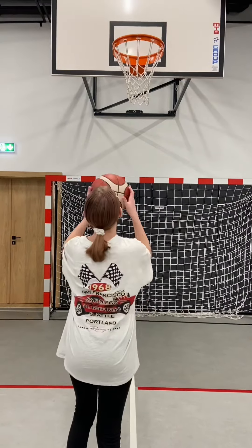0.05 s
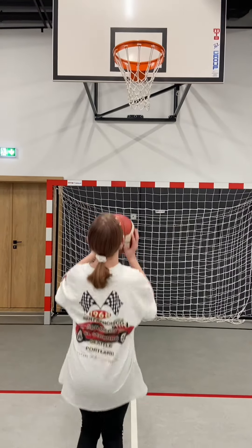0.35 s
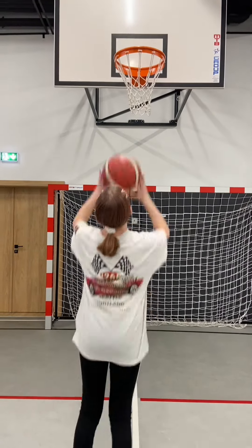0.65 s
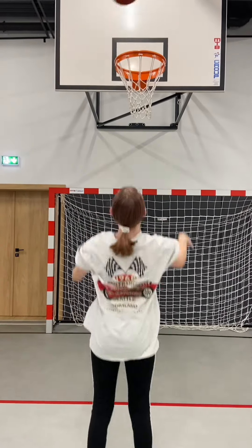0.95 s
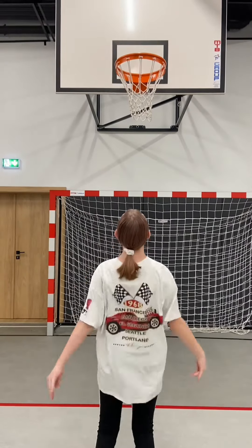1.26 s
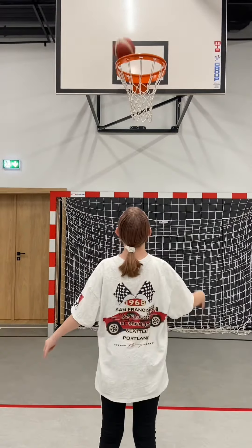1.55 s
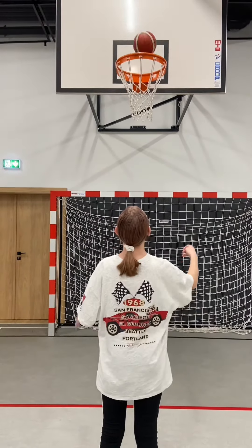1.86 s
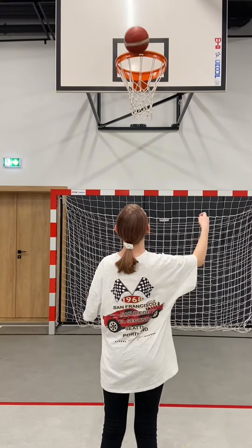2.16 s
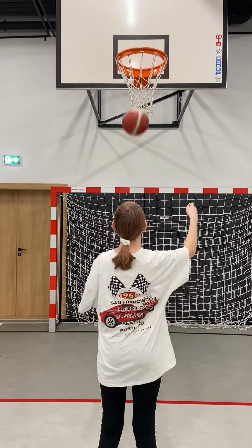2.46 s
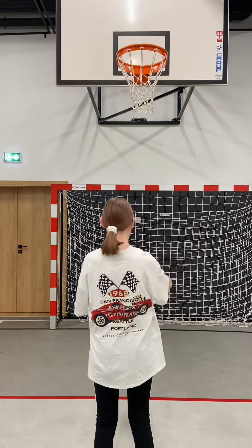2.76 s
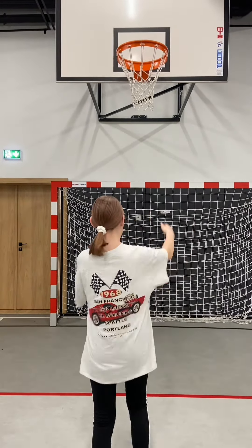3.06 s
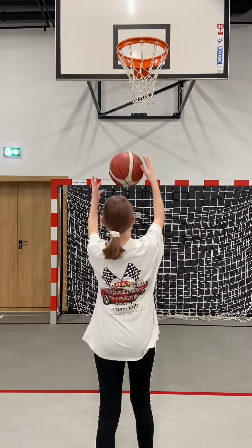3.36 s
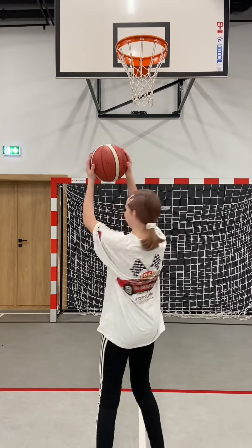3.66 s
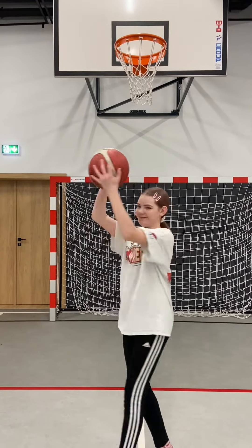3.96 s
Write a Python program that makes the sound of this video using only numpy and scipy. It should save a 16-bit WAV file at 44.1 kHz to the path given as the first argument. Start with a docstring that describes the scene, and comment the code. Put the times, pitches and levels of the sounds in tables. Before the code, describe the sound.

Basketball booming off the backboard and clattering on the rim, then one echoing floor bounce.

```python
"""A basketball slaps a backboard, whose frame booms and rattles, in a large, very live sports hall.
The ball knocks about on the steel rim, brushes the net, bounces once on the sprung floor and is caught.
Shoes thump and squeak over the hall's rumble. Impacts are impulses and bursts of small contacts that
drive filters, ringing modes and the hall's echo. A limiter holds the loud echoes down."""
import sys
import numpy as np
from scipy import signal
from scipy.fft import rfft, irfft, next_fast_len
from scipy.io import wavfile
from scipy.ndimage import uniform_filter1d, minimum_filter1d, map_coordinates

SR = 44100
rng = np.random.default_rng(int(sys.argv[2]) if len(sys.argv) > 2 else 0)


def wav_out(sig):
    """Save sig, one row per channel (or a flat mono array), as 16-bit PCM at SR to the path in sys.argv[1]."""
    wavfile.write(sys.argv[1], SR, np.round(np.clip(np.atleast_2d(sig).T, -1, 1) * 32767).astype(np.int16))


N = 176400

# Hall decay. Each row: frequency in Hz, T60 in seconds.
HALL_T60_S = [(60, 5.7), (150, 4), (400, 2.29), (1000, 7.5), (2500, 3.86), (5000, 1.85), (8000, 0.79),
              (11000, 0.65), (16000, .5)]
# First wall and floor echoes. Each row: delay in seconds, level in dB.
EARLY_ECHOES = [(.0172, 21), (0.0293, 28), (.037, 18.5), (0.0449, 16)]
# Diffuse field. Each row: frequency in Hz, left-right correlation (clipped to +-1 in use).
COHERENCE = [(100, 1), (280, 0.97), (500, 0.63), (900, -0.11), (1400, -0.12), (2500, 0.035), (5000, 0.81),
             (7300, -1.2), (9500, 0.46), (13000, 0.017)]
# Rumble envelope. Each row: time in seconds, level in dB.
RUMBLE_LEVEL_DB = [(0, -20), (.5, -19.5), (1.5, -21.5), (4, -19.5)]

# Source, echo and microphone spectra. Each row: frequency in Hz, gain in dB.
RUMBLE_EQ_DB = [(15, -50.5), (27, -17.5), (45, -7), (75, 0), (120, -3), (190, -0.5), (290, -5.5),
                (390, -15), (570, -13.5), (800, -17), (1200, -22), (2000, -27.5), (2900, -34),
                (3800, -43.5), (5200, -52.5), (7000, -65), (9800, -62), (13000, -69), (15500, -79.5)]
SWISH_EQ_DB = [(500, -27), (3000, 1.5), (5500, 15), (7300, -6), (10000, 5), (12000, 1.5), (16000, -18)]
PAT_EQ_DB = [(80, -33), (300, -7), (1000, -27.5), (2600, -16), (4200, -32), (5500, -27), (7300, -43.5),
             (10000, -38.5), (16000, -51.5)]
STEP_EQ_DB = [(25, -29), (70, 8), (120, 3), (200, -9.5), (400, -28), (2000, -52), (16000, -87)]
BOARD_EQ_DB = [(25, 17.5), (45, -5.5), (68, 21), (95, 8), (125, 19.5), (165, 19.5), (210, 5), (300, 7.5),
               (450, -5), (580, 0.5), (760, -7.5), (1150, -5.5), (2000, -6.5), (2900, -12), (4000, -18.5),
               (6000, -20.5), (9000, -31), (16000, -60.5)]
SOFT_BALL_EQ_DB = [(500, -2.5), (2000, -2), (4000, -9), (10000, -14)]
RATTLE_EQ_DB = [(100, -9.5), (400, 14), (1400, 9.5), (2800, 1.5), (4200, -20), (5800, -23), (7500, -61),
                (11000, -21), (16000, -44)]
KNOCK_EQ_DB = [(30, -20.5), (65, 18.5), (100, 2.5), (170, 1), (280, 0), (450, -14.5), (1200, -17),
               (2700, -22), (4000, -44), (16000, -61.5)]
JANGLE_EQ_DB = [(300, -50.5), (1500, -29), (2900, -20), (4000, -25), (5400, -22), (7300, -35.5),
                (9500, -28.5), (11500, -36), (13000, -48), (16000, -40)]
NET_EQ_DB = [(500, -11), (3000, 2), (5000, 13), (7300, -8.5), (9000, 7), (10500, -7.5), (16000, -20)]
BOUNCE_EQ_DB = [(25, -26), (45, 17), (62, 26.5), (85, 14), (115, 23.5), (170, 17), (220, 2), (270, 10),
                (340, 0.5), (455, 4), (560, -13), (780, -15), (1200, -27.5), (1800, -12), (2500, -7.5),
                (3100, -11.5), (3900, -22.5), (5200, -22), (7000, -31.5), (10000, -29), (13000, -35.5),
                (16000, -28)]
CRACK_EQ_DB = [(60, 10), (300, 26), (1000, 27.5), (1800, 21.5), (2600, 25), (3300, 13.5), (4300, 15),
               (5600, 1), (7000, -20), (16000, -45)]
SNAP_EQ_DB = [(500, 0), (4000, 9), (10000, -8), (13000, -5.5), (16000, -7)]
SKIN_EQ_DB = [(3000, -0.5), (9000, -9.5)]
WALL_EQ_DB = [(150, -8.5), (1200, -4.5), (5000, -4.5)]
MIC_EQ_DB = [(15, -14), (33, 0), (11800, 0), (13200, -4.5), (15700, -4.5)]
# Stereo balance. Each row: frequency in Hz, left minus right in dB.
PAN_DB = [(60, -1), (120, -1), (220, -2), (380, -5), (700, -2.5), (1250, 2), (2400, -0.3), (5000, 0)]

# Shoe squeaks. Each row: centre in seconds, half length in seconds, pitch in Hz, level in dB.
SOLE_SQUEAKS = [(.08, 0.1, 4540, -63), (1.16, 0.02, 4450, -55)]
# Cloth and soles brushing. Each row: centre in seconds, half length in seconds, level in dB.
BRUSHES = [(0.372, .14, -59), (0.704, 0.038, -55.5), (0.975, 0.018, -53.5), (2.902, 0.044, -49.5),
           (2.993, .015, -51), (3.543, 0.033, -58.5), (3.851, .22, -59)]
# Hand and sole taps. Each row: start in seconds, level in dB, T60 in seconds.
TAPS = [(0.667, -11, .012), (.948, -18.5, .03), (.971, -16, 0.022), (3.219, -12.5, .015),
        (3.233, -13.5, .015), (3.425, -14.5, .03), (3.511, -4.5, 0.044), (3.908, -2, 0.047),
        (3.931, -10.5, .04)]
# Feet landing. Each row: start in seconds, level in dB.
LANDINGS = [(.955, -7), (.988, 0), (1.108, -15)]
# Panel slamming in its brackets. Each row: start in seconds, level in dB.
PANEL_HITS = [(1.585, 2), (1.626, -3), (1.652, -3), (1.687, -8)]
# Ball on the rim. Each row: start in seconds, knock level in dB, jangle level in dB.
RIM_TOUCHES = [(1.712, 4, 3.5), (1.745, 4, -1), (1.776, -4.5, -6), (1.99, -8, -18), (2.025, -8.5, -13.5),
               (2.06, -1.5, -10.5), (2.209, -18.5, -19)]

# Board and frame modes. Each row: frequency in Hz, level in dB, T60 in seconds, rise in seconds.
BOOM_MODES = [(62.9, -10, 4.8, 0.71), (72.1, -14, 6.4, .25), (126.9, -17, 13, 0.21),
              (157.4, 7.5, 0.33, 0.0034), (180.6, -3.5, 0.47, 0.0024), (233, -2, .22, .002),
              (343, -1.5, 0.08, 0.0015), (613, -9, 0.044, 0.0012)]
# Panel, hoop mount, rim steel and ball modes. Each row: frequency in Hz, level in dB, T60 in seconds.
PANEL_MODES = [(535, -25.5, 0.54), (775, -33.5, 0.51), (930, -24.5, 1), (1460, -22, 0.59),
               (1670, -31.5, .6), (1750, -25.5, .8), (1930, -20.5, 0.63), (2365, -29.5, .64),
               (2655, -29.5, .4), (3060, -29, .6), (3700, -32.5, 0.52)]
FLEX_MODES = [(193.3, -8, .16), (276, -9.5, .17), (350, -15, .15)]
STEEL_MODES = [(581, -28, 2), (1310, -33, 2), (1415, -33, 2), (1815, -32, 1.5), (2078, -32, 1.5),
               (2568, -35, 1.4), (2686, -35, 1.3), (2885, -34, 1.6), (3402, -38, 1.2), (4085, -41, 1.5),
               (4511, -34, 2), (4830, -40, 1.6), (5260, -39, 1.7), (5680, -43, 1.5), (9092, -49, .9),
               (9194, -50, .9), (9725, -50, .7)]
BALL_MODES = [(455, -18, .14), (975, -14, .05), (2470, -13, 0.017)]
# Air resonances in the ball. Each row: frequency in Hz, bandwidth in Hz, gain in dB.
CAVITY_MODES = [(933, 94, -2.5), (1009, 58, -7), (1280, 97, -18), (1439, 110, -8), (2470, 140, -25),
                (2870, 26, -6.5), (3050, 40, -19.5)]

BOARD_S, BOUNCE_S = 1.592, 2.8523
LEFT_RIGHT = np.array([[1], [-1]])


def amp(db):
    """dB to gain."""
    return 10 ** (np.asarray(db) / 20)


def along(points, hz):
    """Interpolate (Hz, value) points on a log axis."""
    knots_hz, values = np.transpose(points)
    return np.interp(np.log(hz + 1), np.log(knots_hz + 1), values)


def since(start_s):
    """Seconds since start_s, zero before."""
    return np.maximum(np.arange(N) / SR - start_s, 0)


def swell(centre_s, half_s):
    """Gaussian envelope."""
    return np.exp(-.5 * ((since(0) - centre_s) / half_s) ** 2)


def wobble(knots_per_s):
    """Smooth random curve."""
    return map_coordinates(rng.standard_normal(2000), [np.arange(N) * knots_per_s / SR], mode="wrap")


def filtered(x, response):
    """Apply a complex frequency response."""
    size = next_fast_len(N + SR // 2)
    return irfft(rfft(x, size) * response(np.fft.rfftfreq(size, 1 / SR)), size)[..., :N]


def eq(x, curve_db):
    """Minimum-phase filter from a folded cepstrum."""
    size = 8192
    cepstrum = irfft(np.log(amp(along(curve_db, np.fft.rfftfreq(size, 1 / SR)))))
    cepstrum[1:size // 2] *= 2
    cepstrum[size // 2 + 1:] = 0
    kernel = irfft(np.exp(rfft(cepstrum)))
    return signal.oaconvolve(np.atleast_2d(x), kernel[None], axes=1)[:, :N]


def impulse(start_s, db):
    """One-sample blow."""
    return amp(db) * (np.arange(N) == round(start_s * SR))


def envelope(start_s, t60_s, rise_s):
    """Exponential rise and decay."""
    t = since(start_s)
    return (1 - np.exp(-t / rise_s)) * amp(-60 * t / t60_s)


def chatter(start_s, t60_s, per_s, rise_s):
    """Burst of small random contacts, energy 1."""
    contacts = (rng.random(N) < per_s / SR) * rng.standard_normal(N)
    burst = contacts * envelope(start_s, t60_s, rise_s)
    return burst / (np.linalg.norm(burst) + 1e-9)


def ring(start_s, hz, t60_s, rise_s, drift_rad):
    """One decaying mode with wandering phase."""
    phase = 2 * np.pi * hz * since(start_s) + drift_rad * wobble(14)
    return np.sin(phase) * envelope(start_s, t60_s, rise_s)


def struck(hits, modes, flutter_hz):
    """Hits ring steel modes that flutter differently on each side."""
    sides = [sum(amp(db) * ring(0, hz, t60_s, .0018, drift_rad=.6) * wobble(flutter_hz)
                 for hz, db, t60_s in modes) for _ in range(2)]
    return signal.fftconvolve(hits[None], np.array(sides), axes=1)[:, :N]


def diffuse():
    """Stereo white noise arriving from all sides."""
    def mid_side_gains(hz):
        angle = np.arccos(np.clip(along(COHERENCE, hz), -1, 1)) / 2
        return np.array([np.cos(angle), np.sin(angle)])
    mid, side = filtered(rng.standard_normal((2, N)), mid_side_gains)
    return np.array([mid + side, mid - side])


def in_hall(x, direct_db, gap_s=.014, build_s=.014):
    """Direct sound, early echoes, then a long tail building behind them."""
    hz, t, spectrum = signal.stft(diffuse(), SR, nperseg=512)
    decay = amp(-60 * t / along(HALL_T60_S, hz)[:, None])
    tail = signal.istft(spectrum * decay, SR, nperseg=512)[1][:, :N]
    tail *= 1 - np.exp(-since(gap_s) / build_s)
    early = [sum(amp(db) * chatter(s, .016, 14000, .00025) for s, db in EARLY_ECHOES) for _ in range(2)]
    response = tail + eq(early, WALL_EQ_DB)
    return amp(direct_db) * x + signal.fftconvolve(np.atleast_2d(x), response, axes=1)[:, :N]


def rumble():
    """The hall's air and distant noise, nearly steady."""
    noise = eq(diffuse(), RUMBLE_EQ_DB)
    level_db = np.interp(since(0), *np.transpose(RUMBLE_LEVEL_DB))
    return amp(level_db) * noise / np.sqrt(np.mean(noise ** 2))


def squeaks(roughness_rad=1.9):
    """Soles squeak: short tones with rough phase."""
    return sum(amp(db) * swell(s, half_s) * np.sin(2 * np.pi * hz * since(0) + roughness_rad * wobble(90))
               for s, half_s, hz, db in SOLE_SQUEAKS)


def swishes():
    """Cloth and soles brush: swells of hiss."""
    return eq(diffuse(), SWISH_EQ_DB) * sum(amp(db) * swell(s, half_s) for s, half_s, db in BRUSHES)


def pats():
    """Hands tap the ball, soles tap the floor."""
    contacts = sum(amp(db) * chatter(s, t60_s, 6000, .0011) for s, db, t60_s in TAPS)
    return amp(-16) * eq(in_hall(contacts, direct_db=40), PAT_EQ_DB)


def steps():
    """Landing feet thump the floor."""
    hits = sum(impulse(s, db) for s, db in LANDINGS)
    return eq(in_hall(hits, direct_db=42.5), STEP_EQ_DB)


def fittings(contacts, count, t60_s=.06, ring_share=.35):
    """Contacts ring short, scattered modes of bolts, hooks and springs."""
    t = np.arange(SR // 4) / SR
    hz = np.geomspace(600, 13000, count) * np.exp(.012 * rng.standard_normal(count))
    modes = np.sin(2 * np.pi * (hz[:, None] * t + rng.random((count, 1))))
    response = np.sqrt(hz) @ modes * amp(-60 * t / t60_s)
    rung = signal.fftconvolve(contacts, response / np.linalg.norm(response))[:N]
    return np.sqrt(1 - ring_share) * contacts + np.sqrt(ring_share) * rung


def backboard(waver_db=1.5):
    """The soft ball slaps; the panel buzzes and clanks, the frame booms, loose fittings rattle."""
    hit = impulse(BOARD_S, 0)
    buzz = amp(24) * chatter(BOARD_S - .004, t60_s=.16, per_s=6000, rise_s=.0011)
    slap = eq(in_hall(hit, direct_db=3) + eq(amp(15) * hit + buzz, SOFT_BALL_EQ_DB), BOARD_EQ_DB)
    depth_db = waver_db * np.tanh(since(BOARD_S) / .3)
    boom = sum(ring(BOARD_S, hz, t60_s, rise_s, drift_rad=.54) * amp(db + depth_db * wobble(9))
               for hz, db, t60_s, rise_s in BOOM_MODES)
    clank = struck(sum(impulse(s, db) for s, db in PANEL_HITS), PANEL_MODES, flutter_hz=30.2)
    rattle = [fittings(chatter(1.584, t60_s=1.5, per_s=2500, rise_s=.001), count=110) for _ in range(2)]
    return slap + boom + clank + amp(20.5) * eq(rattle, RATTLE_EQ_DB)


def rim():
    """Each touch flexes the hoop, jangles spring and hooks, shakes the board's fittings, rings steel."""
    hits = sum(impulse(s, db) for s, db, _ in RIM_TOUCHES)
    flex = sum(amp(db + mode_db) * ring(s, hz, t60_s, .005, drift_rad=.86)
               for s, db, _ in RIM_TOUCHES for hz, mode_db, t60_s in FLEX_MODES)
    hooks = sum(amp(db) * chatter(s, t60_s=.23, per_s=1500, rise_s=.0033) for s, _, db in RIM_TOUCHES)
    jangle = eq(in_hall(hooks, direct_db=26) + amp(32) * fittings(hooks, count=150), JANGLE_EQ_DB)
    shake = sum(amp(db + 10) * chatter(s, t60_s=.2, per_s=1200, rise_s=.002) for s, db, _ in RIM_TOUCHES)
    clatter = eq(fittings(shake, count=110), RATTLE_EQ_DB)
    steel = amp(-6) * struck(hits, STEEL_MODES, flutter_hz=16)
    knock = eq(in_hall(hits, direct_db=18.5), KNOCK_EQ_DB)
    return knock + jangle + clatter + flex + steel


def net():
    """The ball brushes the net: one swell of hiss."""
    return amp(-46) * eq(diffuse(), NET_EQ_DB) * swell(centre_s=2.1, half_s=.075)


def floor_dispersion(hz, lag_s=.0018, s_per_octave=.0017):
    """All-pass response of the floor: treble bending waves run ahead."""
    return np.exp(-2j * np.pi * hz * (lag_s - s_per_octave * np.log2((hz + 1) / (1000 * np.e))))


def ball_cavity(hz):
    """Resonant response of the air in the ball."""
    return sum(amp(db) * 1j * hz * width_hz / (mode_hz ** 2 - hz ** 2 + 1j * hz * width_hz)
               for mode_hz, width_hz, db in CAVITY_MODES)


def bounce(snap_lead_s=.00003):
    """Ball on floor: a falling crack, quivering skin, a thump, a hollow smack, a ping in the hall."""
    hit = impulse(BOUNCE_S, .91)
    echo = in_hall(hit, direct_db=24.5)
    ping = filtered(echo, ball_cavity)
    crack = eq(filtered(hit, floor_dispersion), CRACK_EQ_DB) * amp(-1.7 * LEFT_RIGHT)
    quiver = amp(-2.5) * eq(chatter(BOUNCE_S, t60_s=.06, per_s=8000, rise_s=.001), SKIN_EQ_DB)
    snap = eq(hit + quiver, SNAP_EQ_DB)
    snap = filtered(snap, lambda hz: np.exp(1j * np.pi * hz * snap_lead_s * LEFT_RIGHT))
    thump = amp(11.5) * ring(BOUNCE_S + .0052, hz=146, t60_s=.042, rise_s=.0022, drift_rad=.2)
    smack = sum(amp(db) * ring(BOUNCE_S, hz, t60_s, .00046, drift_rad=.2) for hz, db, t60_s in BALL_MODES)
    return eq(echo, BOUNCE_EQ_DB) + ping + smack + crack + snap + thump


def mic_pair(hz, left_lead_s=.000045):
    """Stereo response: level balance, bass slightly earlier on the left."""
    lead_rad = 2 * np.pi * np.minimum(hz, 600) * left_lead_s
    return amp(along(PAN_DB, hz) * LEFT_RIGHT / 2) * np.exp(1j * lead_rad * LEFT_RIGHT / 2)


def limiter(x, limit_db, release_db_per_s):
    """Look-ahead limiter with a steady release."""
    over_db = np.maximum(20 * np.log10(np.abs(x).max(0) + 1e-9) - limit_db, 0)
    recovery_db = release_db_per_s * since(0)
    gain = amp(recovery_db - np.maximum.accumulate(over_db + recovery_db))
    held = minimum_filter1d(gain, size=129)
    return x * uniform_filter1d(uniform_filter1d(held, size=65), size=65)


def scene():
    """All sources at the two microphones."""
    mix = backboard() + rim() + bounce() + steps() + pats() + swishes() + squeaks() + net() + rumble()
    return filtered(mix, mic_pair)


def record(dry):
    """Slow limiter, microphone roll-off, fast limiter, band limit."""
    x = limiter(dry, limit_db=2.5, release_db_per_s=21.5)
    x = filtered(x, lambda hz: amp(along(MIC_EQ_DB, hz)))
    x = limiter(x, limit_db=-.2, release_db_per_s=300)
    return filtered(x, lambda hz: hz < 15700)


dry = scene()
out = record(dry)
wav_out(out)
```